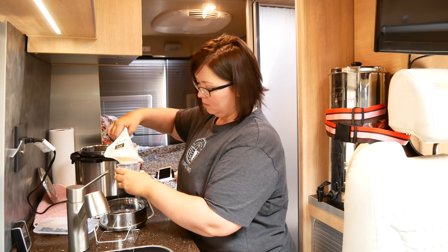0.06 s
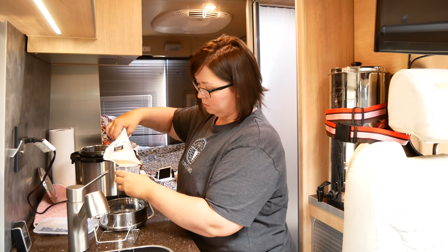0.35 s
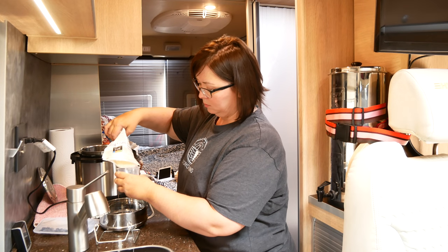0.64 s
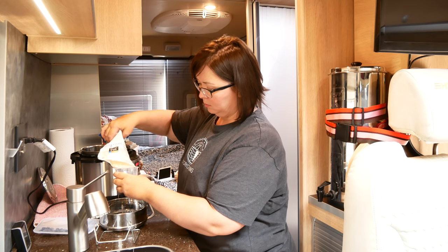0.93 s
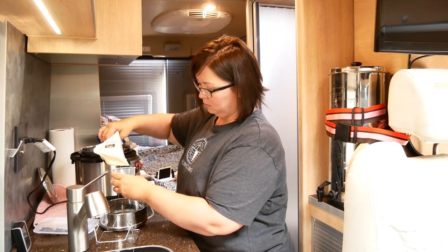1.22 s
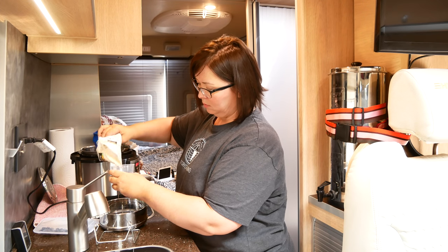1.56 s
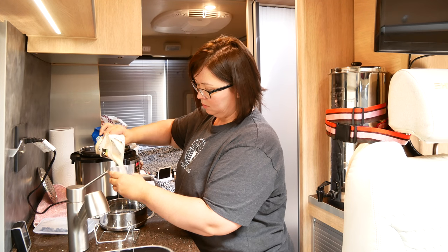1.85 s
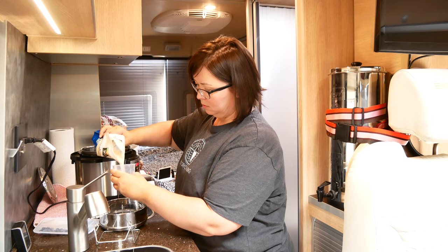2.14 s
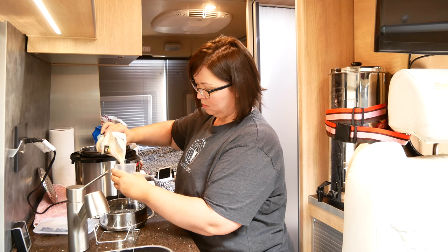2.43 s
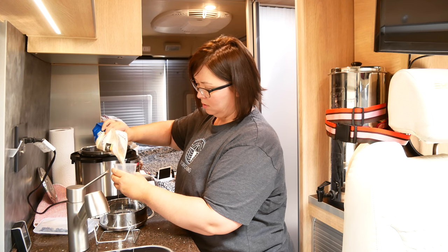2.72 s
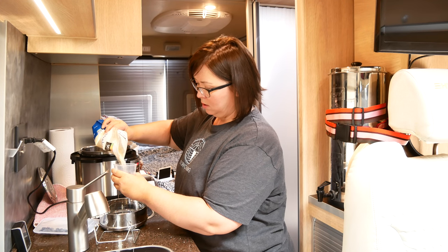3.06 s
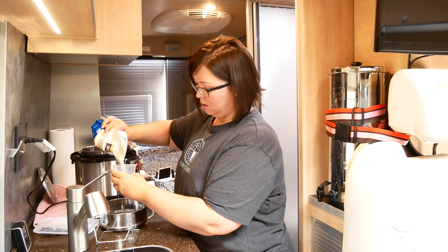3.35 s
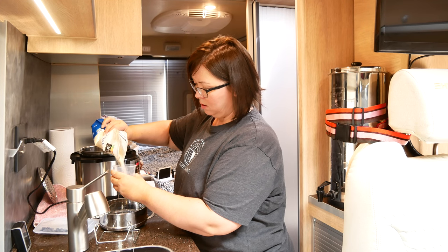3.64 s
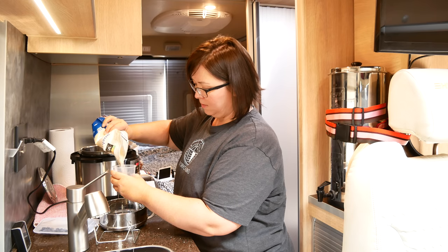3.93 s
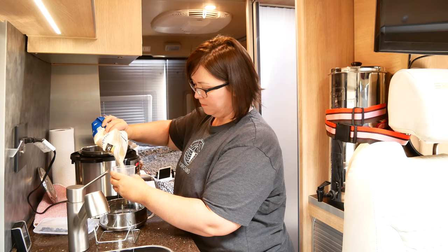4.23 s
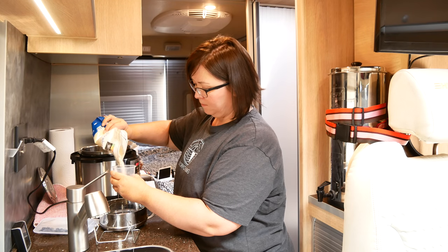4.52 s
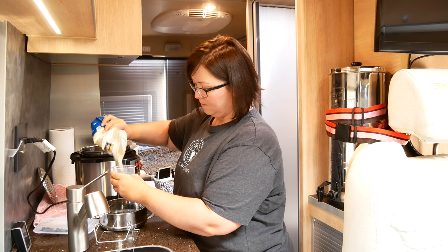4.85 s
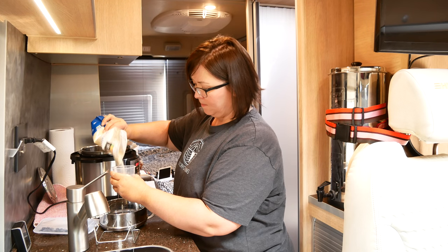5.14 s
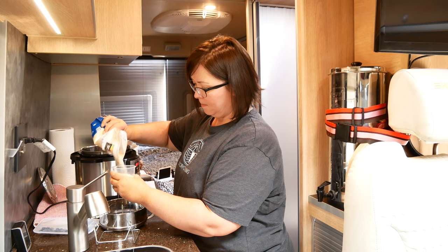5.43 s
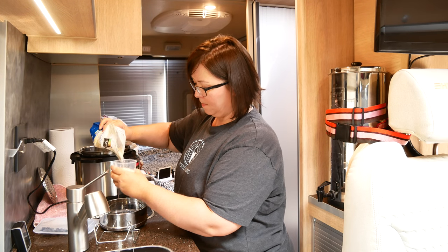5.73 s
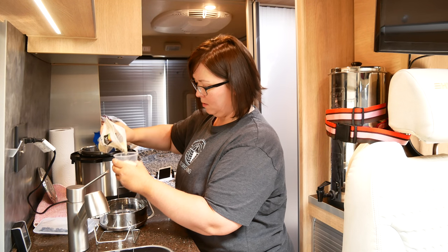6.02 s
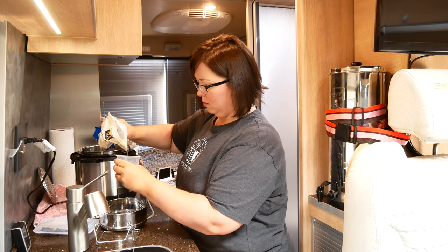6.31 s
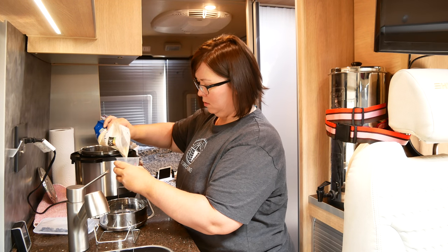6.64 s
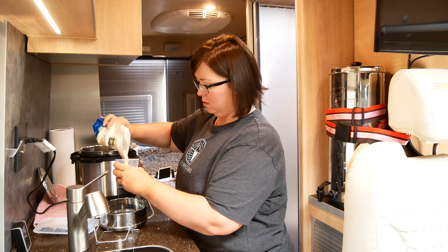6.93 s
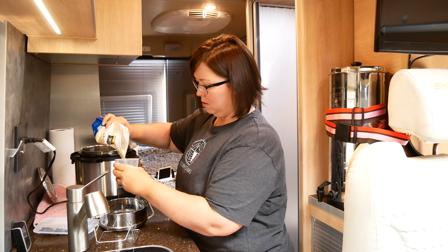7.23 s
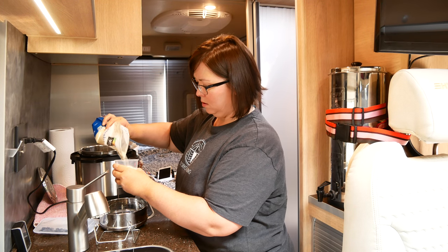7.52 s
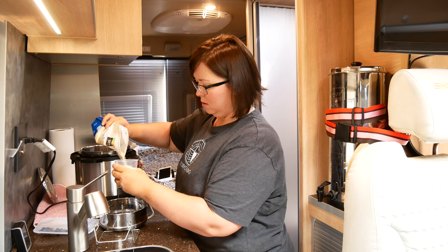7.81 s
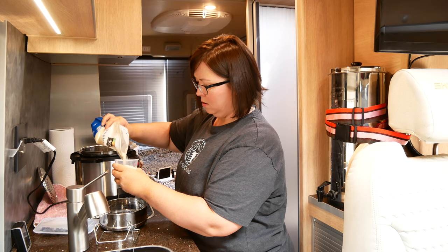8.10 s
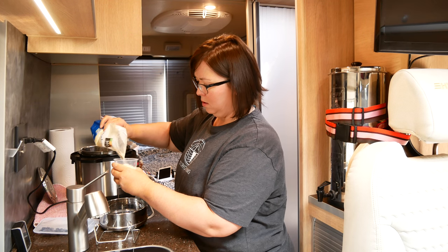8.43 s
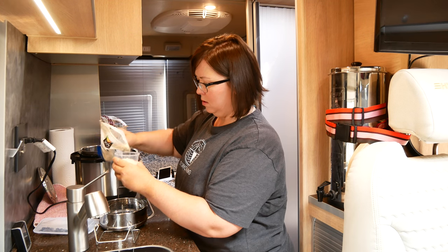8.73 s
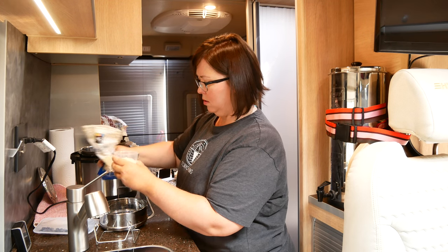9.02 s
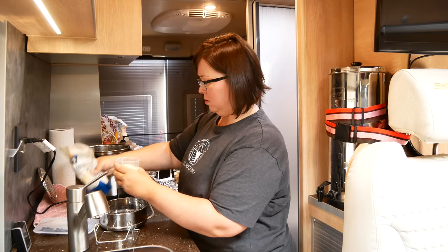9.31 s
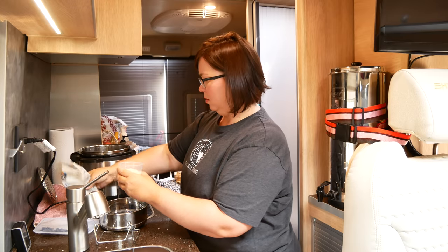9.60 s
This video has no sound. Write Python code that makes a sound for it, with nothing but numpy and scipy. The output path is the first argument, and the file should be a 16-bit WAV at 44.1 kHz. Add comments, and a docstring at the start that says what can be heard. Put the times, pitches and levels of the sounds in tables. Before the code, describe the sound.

In a small kitchen with a faint hush, rice rushes into a nearly empty cup, drumming on its bottom. A long, light patter of grains follows, dotted with crisp snaps and rustles from the plastic bag. Brief spurts come as the last grains are shaken out. It ends with a swish of rice settling in the bag and a short hollow knock on the counter, all near the microphone.

```python
"""Dry rice pours from a plastic bag into a hand-held measuring cup in a small kitchen.
Granular impacts make hissing gushes that excite the cup's resonances, then a duller trickle.
The bag rustles; its buckling creases and a few hard grains striking the cup make sharp snaps.
Short shakes top the cup up. Then the bag is righted, the load slumps inside it,
and knocks on the counter ring in damped modes."""
import sys
import numpy as np
from scipy import signal
from scipy.fft import rfft, irfft
from scipy.io import wavfile

SR = 44100
rng = np.random.default_rng(int(sys.argv[2]) if len(sys.argv) > 2 else 0)


def dump(signal):
    """Clip the signal to [-1, 1] and save it as 16-bit WAV at the path in sys.argv[1]."""
    limited = np.clip(np.atleast_2d(signal).T, -1, 1)
    pcm = np.round(limited * 32767).astype(np.int16)
    wavfile.write(sys.argv[1], SR, pcm)


N = 430416
TIME = np.arange(N) / SR
BINS = np.fft.rfftfreq(2048, 1 / SR)


def gain_of(db):
    return 10 ** (np.asarray(db) / 20)

def unit(x):
    """Normalisation to unit energy."""
    return x / np.sqrt(np.sum(x ** 2) + 1e-20)

def curve(points, hz=BINS):
    """Interpolation on a log-frequency axis."""
    knots_hz, value = np.transpose(points)
    return np.interp(np.log(hz + 1), np.log(knots_hz + 1), value)

def add(mix, start_s, sound):
    """Superposition of a sound on the mix."""
    part = mix[:, max(round(start_s * SR), 0):][:, :sound.shape[1]]
    part += sound[:, :part.shape[1]]

# Diffuse sound at two close microphone ports: frequency_hz, coherence
COHERENCE = [(100, 0.87), (300, 0.8), (500, 0.7), (1100, 0.97), (2500, 0.87), (4500, 0.3), (8000, 0.28),
             (12000, -.45)]
def diffuse(noises):
    """Spatial coherence: two independent noises mix into one diffuse field at two ports."""
    size = noises.shape[1]
    a, b = rfft(noises)
    coherence = np.clip(curve(COHERENCE, np.fft.rfftfreq(size, 1 / SR)), -.99, .99)
    mid, side = a * np.sqrt((1 + coherence) / 2), b * np.sqrt((1 - coherence) / 2)
    return irfft(np.array([mid + side, mid - side]), size)

# The kitchen's reverberation time: frequency_hz, t60_s
ROOM_DECAY = [(200, 0.33), (1200, 0.22), (4000, 0.12), (10000, 0.1), (15000, 0.1)]
def path(near_db, room_db, near_s=0.005, lag_s=1.1e-5, size=8192):
    """Impulse response from one spot: direct sound, scatter off cup and counter, reverberation."""
    t = np.arange(size) / SR
    scatter = diffuse(rng.standard_normal((2, size)) ** 3) * np.exp(-t / near_s)
    reflections = diffuse(rng.standard_normal((2, size)) ** 3)
    hz, delay_s, bands = signal.stft(reflections, SR, nperseg=128, axis=1)
    decay = gain_of(-60 * delay_s / curve(ROOM_DECAY, hz)[:, None])
    tail = signal.istft(bands * decay, SR)[1][:, :size] * np.clip(t / 0.0013, 0, 1)
    direct = np.sinc(np.arange(size) - 8 - np.array([[lag_s * SR], [0]]))
    response = unit(direct) + gain_of(near_db) * unit(scatter) + gain_of(room_db) * unit(tail)
    return np.sqrt(2) * unit(response)

def tick(colour_db):
    """Minimum phase: the shortest causal pulse with this spectral shape, at unit energy."""
    log_gain = np.log(gain_of(np.r_[colour_db, colour_db[-2:0:-1]]))
    return unit(np.fft.ifft(np.exp(np.conj(signal.hilbert(log_gain)))).real)

def radiate(clicks, colour_db, paths, block=200):
    """Convolution colours the clicks and carries each block along a randomly chosen path."""
    visits = rng.integers(0, len(paths), len(clicks) // block + 1)
    spot = np.repeat(visits, block)[:len(clicks)]
    pulse = tick(colour_db)[None]
    return sum(signal.oaconvolve((clicks * (spot == k))[None], signal.fftconvolve(response, pulse))
               for k, response in enumerate(paths))[:, :N]

def strengths(spread_db, shape):
    """Collision amplitudes whose levels follow a capped exponential distribution."""
    return gain_of(spread_db * np.minimum(rng.exponential(1, shape), 4))

def impacts(per_s, spread_db, size=N):
    """Shot noise: independent collisions at unit mean power."""
    strength = strengths(spread_db, size)
    hits = rng.choice([-1, 1], size) * (rng.random(size) < per_s / SR)
    return unit(strength * hits) * np.sqrt(size)

def pings(per_s, spread_db, size=160):
    """Free vibrations of a few milliseconds, each at a random pitch, at unit mean power."""
    shape = (size // 2 + 1, 4 * N // size + 6)
    strength = strengths(spread_db, shape)
    sounding = rng.random(shape) < per_s * TIME[-1] / strength.size
    cells = sounding * strength * np.exp(2j * np.pi * rng.random(shape))
    return unit(signal.istft(cells, nperseg=size, noverlap=size * 3 // 4)[1][:N]) * np.sqrt(N)

def stream(ticks, rings, ring_share):
    """Incoherent sources add in power: some only tick, others ring briefly."""
    return np.sqrt(1 - ring_share) * ticks + np.sqrt(ring_share) * rings

def avalanches(depth_db, span_s):
    """Random amplitude modulation: events bunch into little avalanches."""
    knots_s = np.arange(0, TIME[-1] + span_s, span_s)
    swing = np.clip(rng.standard_normal(len(knots_s)), -2, 2)
    return unit(gain_of(depth_db * np.interp(TIME, knots_s, swing))) * np.sqrt(N)

def burst(crest_s, per_s, spread_db, roundness=1, size=4000):
    """Shot noise under an envelope that swells and dies, at unit energy."""
    age = np.arange(size) / SR / crest_s
    return unit(impacts(per_s, spread_db, size) * (age * np.exp(-age)) ** roundness)

def resonances(modes, floor_db):
    """Spectrum in dB of broad modes summed in power, with the bass rolled off."""
    power = sum(gain_of(db) ** 2 / (1 + 2 * ((BINS - hz) / width_hz) ** 2) ** 2
                for hz, width_hz, db in modes)
    return 10 * np.log10(power + gain_of(floor_db) ** 2) + curve([(30, -30), (400, 0)])

def peak(hz, height_db, half_width_hz):
    """One bell-shaped resonance peak in dB."""
    return height_db / (1 + ((BINS - hz) / half_width_hz) ** 2)

def flow_of(rows):
    """Envelope that follows a level curve and is silent outside it."""
    time_s, db = np.transpose(rows)
    return gain_of(np.interp(TIME, time_s, db, left=-140, right=-140))

def swells(rows, skirt):
    """Envelope of movements that each crest and die away, summed in power."""
    return np.sqrt(sum(gain_of(db) ** 2 * np.exp(-np.minimum(abs((TIME - s) / half_s) ** skirt, 40))
                       for s, db, half_s in rows))

def surge(start_s, end_s, rise_db_per_s, fall_db_per_s, arch_db=1):
    """Envelope that builds up to start_s, holds in a shallow arch and runs out after end_s."""
    progress = np.clip((TIME - start_s) / (end_s - start_s), 0, 1)
    arch = arch_db * (2 * progress - 1) ** 2
    edges = rise_db_per_s * np.maximum(start_s - TIME, 0) + fall_db_per_s * np.maximum(TIME - end_s, 0)
    return gain_of(-np.minimum(arch + edges, 140))


# Resonances of the nearly empty cup: pitch_hz, width_hz, level_db
CUP_MODES = [(636, 200, -8.5), (1115, 200, -2), (1324, 120, -1), (1784, 630, -6.5), (2430, 450, -3.5)]
# Spectra of the grains' hiss and of their hardest impacts: frequency_hz, level_db
HISS_COLOUR = [(150, -76), (1500, -39.5), (2900, -16), (3400, -6), (3900, -0.5), (4700, 1), (6000, -2.5),
               (8000, -0.5), (9500, -5.5), (10800, -14.5), (14000, -33)]
HARD_COLOUR = [(500, -67), (4000, -14.5), (8000, 1), (10000, -0.5), (12000, -4), (14000, -8.5),
               (15500, -29.5)]
# Gushes out of the bag: start_s, end_s, hiss_db, rattle_db, hard_db, rise_db_per_s
GUSHES = [(0.0, 0.443, -29.5, -38.5, -61, 500), (0.424, 0.494, -25, -39, -32, 801),
          (0.501, 0.89, -19, -37, -22, 699.5), (0.958, 1.115, -25.5, -38.5, -29.5, 497.5),
          (1.725, 1.78, -39, -48.5, -38, 698.5), (1.785, 2.042, -24.5, -38, -24.5, 898)]
def gushes(paths):
    """Impact excitation: fast grains hiss as they strike, and the cup resonates in a hollow rattle."""
    rattle = hiss = hard = 0
    for start_s, end_s, hiss_db, rattle_db, hard_db, rise in GUSHES:
        pour = surge(start_s, end_s, rise, fall_db_per_s=179.5)
        hiss = np.maximum(hiss, gain_of(hiss_db) * pour)
        hard = np.maximum(hard, gain_of(hard_db) * pour ** 1.2)
        rattle = np.maximum(rattle, gain_of(rattle_db) * surge(start_s, end_s, rise, fall_db_per_s=110))
    flow = avalanches(depth_db=2, span_s=0.007)
    grains = flow * stream(impacts(5400, spread_db=3.5), pings(22000, spread_db=3.5), ring_share=0.56)
    out = radiate(grains * rattle, resonances(CUP_MODES, floor_db=-47), paths[:3])
    out += radiate(grains * hiss, curve(HISS_COLOUR), paths[:5])
    return out + radiate(grains * hard, curve(HARD_COLOUR), paths[4:])

# Spectrum of the kitchen's hush: frequency_hz, level_db
HUSH_COLOUR = [(20, -50), (40, -24), (70, -6), (100, -7), (135, -3.5), (250, -5), (330, -13.5), (560, -13),
               (780, -14.5), (1050, -13.5), (1600, -15.5), (2700, -22), (8000, -23), (15500, -35)]
def hush(level_db=-63.5):
    """Stationary noise in a diffuse field, slightly stronger on the right."""
    white = diffuse(rng.standard_normal((2, N)))
    colour = gain_of(curve(HUSH_COLOUR, np.fft.rfftfreq(N, 1 / SR)))
    noise = unit(irfft(rfft(white) * colour, N)) * np.sqrt(2 * N)
    return gain_of(level_db) * noise * gain_of([[-1.1], [1.1]])

# Spectrum of a sharp snap: frequency_hz, level_db
SNAP_COLOUR = [(200, -34), (1200, -22), (3000, -24.5), (4200, -11.5), (5600, -7.5), (8200, -2), (9600, -4),
               (11200, -9.5), (14000, -12.5), (15500, -26.5)]
# Sharp snaps, the bag's creases and a few hard grains striking the cup:
# start_s, snap_db, crackle_db, pitch_hz, treble_db
SNAPS = [(0.43, 7.5, 1, 7700, 1), (0.4976, 5, -4, 5340, 3), (1.0214, 9.5, 1, 6300, -8),
         (1.223, -7.5, -8, 7680, 8), (1.4229, -2, -25, 5140, 6), (1.5199, -14, -27, 6320, 2),
         (1.5622, -2, -11, 4840, 2), (1.785, -5, -1, 7840, 6), (2.0919, 2, -7, 6500, -7),
         (2.4868, -10, -7, 8800, -1), (2.722, -4.5, -10, 7750, -5), (2.788, -6.5, -4.5, 8550, -11),
         (2.8267, -8, -9.5, 7920, -5), (2.8856, -2.5, -10, 8450, -6), (3.0104, -8.5, -11, 7800, 6),
         (3.04, -24, 2, 7340, 2), (3.131, -6, -1, 6400, -1), (3.1378, -1, -7, 8260, 0),
         (3.221, -6, -12, 7540, -11), (3.2542, -3, -6, 7560, -5), (3.4372, -3, -0.5, 6790, 3),
         (3.459, -4, -2.5, 6400, -12), (3.555, -2, -5.5, 6600, -2), (3.851, -6, -22, 8800, -1),
         (3.8695, -7, -10, 8760, 0), (3.916, 0.5, 0, 6650, 1), (3.953, -2, -2.5, 7460, 8),
         (3.969, -9, -2.5, 6160, 2), (4.2673, -7, -0.5, 9100, 8), (4.3013, -1.5, -17, 7340, -6),
         (4.372, -14, -3, 7850, 4), (4.5438, -7.5, -13, 8400, 7), (4.625, -2.5, -25, 8000, -12),
         (4.894, -15, -14.5, 9500, 16), (5.0045, -26, -12.5, 6200, -3), (5.326, -8.5, 8.5, 8760, 4),
         (5.459, -6, 2, 8900, 3), (5.5354, -5.5, -4.5, 9100, -4), (5.625, -25, -6.5, 8000, -3),
         (5.659, -7.5, -14, 7500, 1), (5.9425, -18.5, -30, 8460, -6), (6.347, -4.5, -6, 8140, -7),
         (6.3802, -5.5, -29, 7350, -19), (6.458, -24, -27, 7200, -21), (6.5012, -24, -38, 7500, -20),
         (7.133, -12, -5, 8060, -2), (7.203, -12.5, -15, 8100, -7), (7.2269, 0.5, -3, 8400, -3),
         (7.2365, -6, 3, 7350, -4), (7.4865, -10, -16, 8100, -8), (7.6276, -5, -13, 8000, -12),
         (8.1697, -4, -2.5, 7370, -7), (8.2137, -23, -11, 7180, -10), (8.2463, -5.5, -25, 8100, -10),
         (8.3865, -7, -20, 8050, -19), (8.4093, -7.5, -8, 8000, -4), (8.5692, -12.5, -26, 7200, -12),
         (8.634, -11.5, -29, 7500, -7), (9.05, -21, 1.5, 5570, -30)]
def snaps(paths, lead_in_db=-20.5, lead_s=0.0015):
    """Buckling and impact: a crease gives way or a hard grain hits the cup, ringing amid a crackle."""
    out = np.zeros((2, N))
    lows, highs = curve([(4600, 1), (6000, 0)]), curve([(9300, 0), (11500, 1)])
    for start_s, snap_db, crackle_db, pitch_hz, treble_db in SNAPS:
        lead_in = gain_of(crackle_db + lead_in_db) * burst(0.0032, per_s=1500, spread_db=-2)[::-1]
        snap = gain_of(snap_db) * burst(crest_s=0.0011, per_s=12000, spread_db=-0.5)
        crackle = gain_of(crackle_db) * burst(crest_s=0.0068, per_s=3800, spread_db=3.5)
        colour = curve(SNAP_COLOUR) + peak(pitch_hz, height_db=8, half_width_hz=500)
        lows_db = 11 * np.log2(7160 / pitch_hz)  # a higher snap has weaker low tones
        colour += lows * lows_db + highs * treble_db
        spot = [paths[rng.integers(len(paths))]]
        add(out, start_s, radiate(snap, colour, spot))
        add(out, start_s - lead_s - len(lead_in) / SR, radiate(np.r_[lead_in, crackle], colour, spot))
    return out

# Resonances of the cup's floor: pitch_hz, width_hz, level_db
FLOOR_MODES = [(1088, 67, -5.5), (1326, 98, -2.5), (2444, 400, -12)]
# Clumps of rice landing: start_s, level_db
CLUMPS = [(0.4335, 1), (0.5029, -3), (0.5796, 2.5), (0.6354, 3.5), (0.6607, -1.5), (0.6956, 4), (0.7501, 2),
          (1.0964, -10)]
def drumming(paths):
    """Plate resonance: whole clumps strike the bare floor of the cup and excite its modes."""
    out, colour = np.zeros((2, N)), resonances(FLOOR_MODES, floor_db=-41.5)
    for start_s, level_db in CLUMPS:
        blow = gain_of(-10) * burst(crest_s=0.003, per_s=2000, spread_db=-1)
        blow[0] += 1  # the main impact
        spot = [paths[rng.integers(len(paths))]]
        add(out, start_s, gain_of(level_db) * radiate(blow, colour, spot))
    return out

# Flow of the thin stream, and of the last grains shaken out: time_s, level_db
TRICKLE_FLOW = [(1.13, -38.5), (1.42, -42.5), (1.68, -50), (2.15, -44.5), (2.62, -52.5), (3.03, -45.5),
                (3.28, -41), (3.8, -41), (4.42, -39.5), (4.87, -46), (5.04, -54), (5.21, -50),
                (5.27, -44.5), (5.6, -41), (5.8, -54.5), (6.25, -73.5)]
DRIBBLE_FLOW = [(6.25, -62), (6.65, -80), (7.2, -55), (7.9, -65.5), (8.1, -62.5), (8.35, -54), (8.72, -69),
                (8.92, -65), (9.15, -49), (9.76, -63)]
# Spectra of grains landing on the heap, and in the filled cup: frequency_hz, level_db
PATTER_COLOUR = [(60, -28), (200, -17), (540, -15.5), (720, -6.5), (900, -6), (1150, 0.5), (1400, -3),
                 (1550, -3.5), (2300, -6), (2900, -6), (4000, -5.5), (8000, -12), (14000, -26.5)]
DRIBBLE_COLOUR = [(260, -41.5), (450, -14), (667, -14), (747, -21), (949, -7.5), (1760, -13.5),
                  (1940, -19.5), (2540, -14), (3660, -18.5), (13000, -30.5)]
def trickle(paths):
    """Granular shot noise: a thin stream patters on the heap, then dwindles to a dribble."""
    grains = stream(impacts(1600, spread_db=1), pings(9000, spread_db=3.5), ring_share=0.64)
    grains *= avalanches(depth_db=2.15, span_s=0.014)
    patter = radiate(grains * flow_of(TRICKLE_FLOW), curve(PATTER_COLOUR), paths[:5])
    dribble = radiate(grains * flow_of(DRIBBLE_FLOW), curve(DRIBBLE_COLOUR), paths[:3])
    return patter + dribble

# Spectrum of the bag's film: frequency_hz, level_db
FILM_COLOUR = [(100, -38.5), (1200, -15), (3000, -15.5), (4000, -5.5), (5600, -4.5), (8200, 1.5),
               (10000, -5.5), (11200, -8), (14000, -14.5), (15500, -29)]
# The hand squeezing the bag: crest_s, level_db, half_length_s
SQUEEZES = [(1.2, -43, 0.1), (2.1, -42, .08), (2.31, -46.5, 0.047), (3.21, -33.5, 0.035), (3.47, -37, 0.1),
            (3.65, -38, 0.045), (3.94, -34.5, 0.047), (4.31, -39, 0.042), (4.46, -42.5, 0.057),
            (5.05, -50.5, 0.35), (5.47, -37.5, .08), (6.36, -58, 0.04), (7.115, -45.5, 0.019),
            (7.22, -40.5, .008)]
def rustle(paths, below_trickle_db=12):
    """Crackling noise: running rice and the squeezing hand set off many small snaps in the film."""
    flexing = np.hypot(gain_of(-below_trickle_db) * flow_of(TRICKLE_FLOW), swells(SQUEEZES, skirt=1.4))
    creases = stream(impacts(3800, spread_db=1.5), pings(16000, spread_db=5.5), ring_share=0.69)
    creases *= avalanches(depth_db=4, span_s=0.013)
    small_snaps = gain_of(-2) * impacts(per_s=150, spread_db=10)
    return radiate((creases + small_snaps) * flexing, curve(FILM_COLOUR), paths[3:])

# Spectra of a spurt landing and of the thud in the bag: frequency_hz, level_db
SPURT_COLOUR = [(200, -61), (2000, -23), (3500, -15.5), (4000, 1), (4400, -1.5), (4800, -7), (5600, -3),
                (6600, -5), (8000, -5.5), (10000, -10), (11500, -33), (15000, -45)]
THUD_COLOUR = [(60, -35), (190, -4), (310, 1), (450, -4.5), (800, -5.5), (1100, 6), (1700, -0.5),
               (2800, -4), (5000, -18.5)]
# Jerks of the bag: start_s, level_db, pitch_hz
SHAKES = [(1.418, -23, 4200), (1.556, -9.5, 4430), (4.3, -2.5, 3960), (5.323, -0.5, 3640),
          (6.6954, -23.5, 3970), (6.8198, -7, 4120), (6.9498, 4, 4100), (7.119, -0.5, 3960),
          (7.351, -27, 4870), (7.47, -23, 4020), (7.613, -22, 4380), (7.7519, -29.5, 3950),
          (7.865, -39, 4000), (8.021, -3.5, 3970), (8.1611, -1.5, 4430), (8.2915, -10.5, 4730),
          (8.429, -12.5, 4180)]
def shakes(paths):
    """Impulsive excitation: tossed grains land almost together and ring, while the bag thuds softly."""
    out = np.zeros((2, N))
    for start_s, level_db, pitch_hz in SHAKES:
        colour = curve(SPURT_COLOUR) + peak(pitch_hz, height_db=6, half_width_hz=180)
        spurt = burst(crest_s=0.0098, per_s=3500, spread_db=1, roundness=1.65)
        thud = burst(crest_s=0.0075, per_s=2500, spread_db=-6, roundness=1.66)
        thud_db = -16.5 + 0.26 * level_db  # grows only slowly with the jerk
        add(out, start_s, gain_of(level_db) * radiate(spurt, colour, paths[:2]))
        add(out, start_s, gain_of(thud_db) * radiate(thud, curve(THUD_COLOUR), paths))
    return out

# Spectrum of rice moving in the bag: frequency_hz, level_db
BAG_COLOUR = [(60, -37), (220, -13), (430, -20.5), (700, -11), (1250, -5.5), (1600, 1.5), (1950, -4),
              (2450, -1.5), (2850, -6.5), (3700, 2), (4700, 1.5), (7600, -2), (11000, -11.5), (15000, -28)]
# Slides of the load: crest_s, level_db, half_length_s
SLUMPS = [(9.14, -45.5, 0.08), (9.275, -23.5, 0.054), (9.42, -49.5, 0.14)]
def slump(paths):
    """Granular flow: dense collisions merge as the load slides down inside the righted bag."""
    grains = stream(impacts(4000, spread_db=0.5), pings(16000, spread_db=4.5), ring_share=0.63)
    return radiate(grains * swells(SLUMPS, skirt=2.93), curve(BAG_COLOUR), paths[3:])

# Modes that a knock excites: pitch_hz, level_db, t60_s
KNOCK_MODES = [(332, -8, 0.043), (692, 2, 0.045), (755, -3, 0.054), (1034, -3.5, 0.04), (1480, -20, 0.08),
               (2380, -3, 0.04), (2420, -10, 0.04), (3230, -17, 0.049), (3500, -6, 0.04), (4160, -5, 0.049),
               (5260, -16, .08)]
# Knocks and light taps on the counter: start_s, ring_db, click_db
KNOCKS = [(9.137, -39.5, -31), (9.4977, -26.5, -4), (9.557, -37, -24), (9.688, -56, -60),
          (9.735, -48.5, -24)]
def knocks(paths, attack_s=0.00055, low_cut_hz=380):
    """Damped modal vibration: a click of contact and a short hollow ring."""
    out, t = np.zeros((2, N)), np.arange(5000) / SR
    ring = sum(gain_of(db - 60 * t / t60_s) * np.cos(2 * np.pi * hz * t) for hz, db, t60_s in KNOCK_MODES)
    low_cut = signal.butter(2, low_cut_hz, "highpass", fs=SR, output="sos")
    ring = signal.sosfilt(low_cut, ring * (1 - np.exp(-t / attack_s)))
    for start_s, ring_db, click_db in KNOCKS:
        add(out, start_s, gain_of(ring_db) * signal.fftconvolve(ring[None], path(near_db=-4, room_db=-19)))
        click = burst(crest_s=0.00057, per_s=9200, spread_db=5)
        add(out, start_s, gain_of(click_db) * radiate(click, curve(BAG_COLOUR), paths[:1]))
    return out

def scene():
    """Superposition: rice, bag and knocks sound slightly to the left, over the kitchen's hush."""
    paths = [path(near_db=-1, room_db=-1, near_s=0.0041) for _ in range(7)]
    rice = gushes(paths) + drumming(paths) + trickle(paths) + shakes(paths) + slump(paths)
    return (rice + snaps(paths) + rustle(paths) + knocks(paths)) * gain_of([[0.2], [-0.2]]) + hush()

def record(dry):
    """Band limiting: a linear-phase low-pass removes the highest treble."""
    low_pass = signal.firwin(255, 15500, window=("kaiser", 9), fs=SR)
    return signal.oaconvolve(dry, low_pass[None], "same")


dry = scene()
out = record(dry)
dump(out)
```